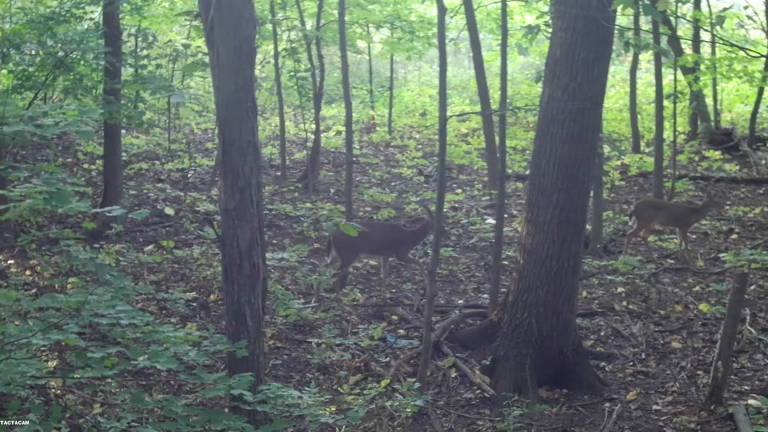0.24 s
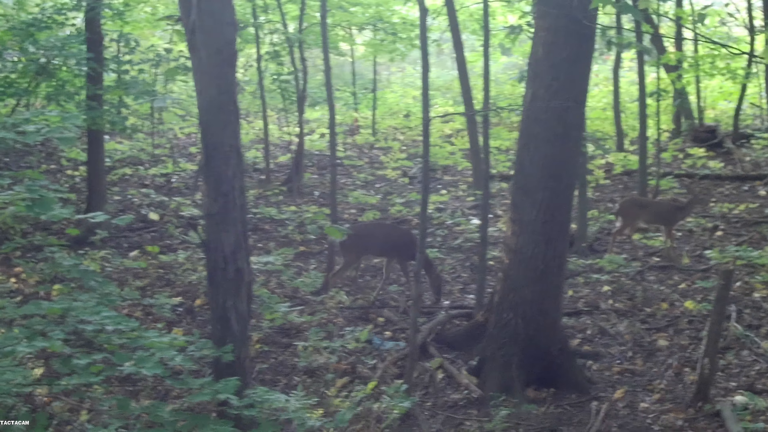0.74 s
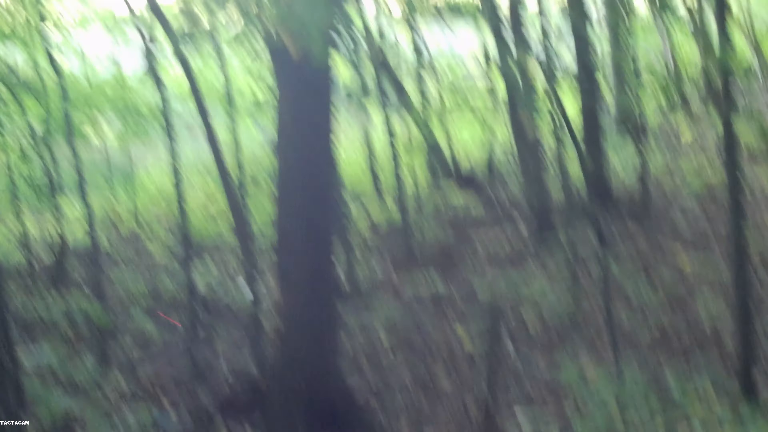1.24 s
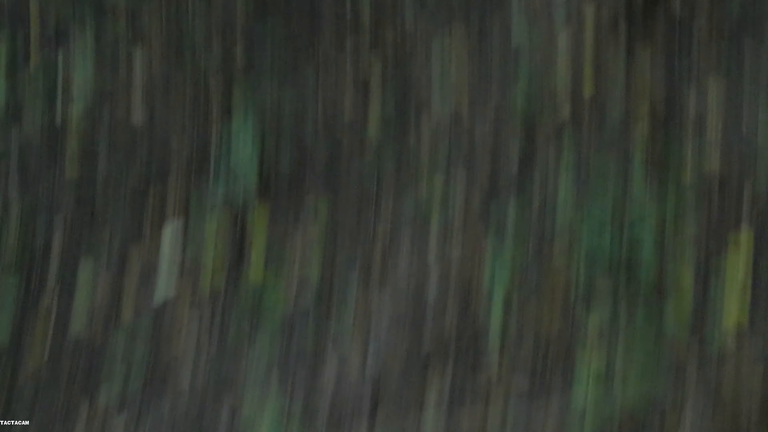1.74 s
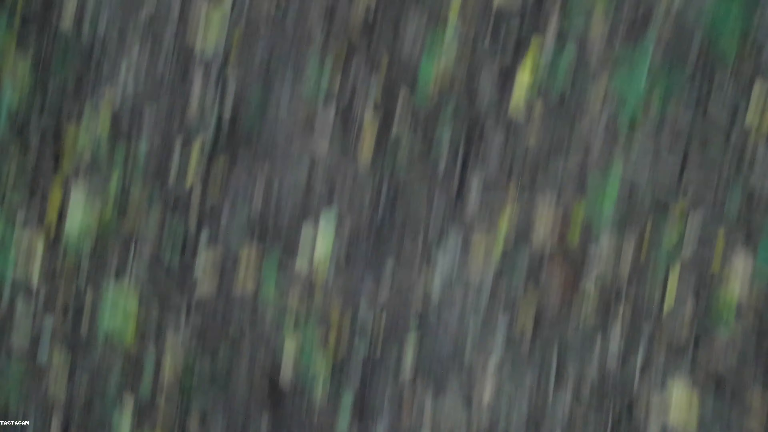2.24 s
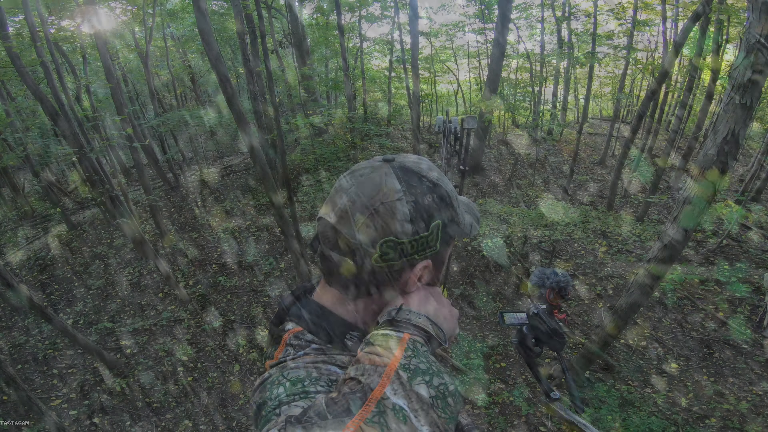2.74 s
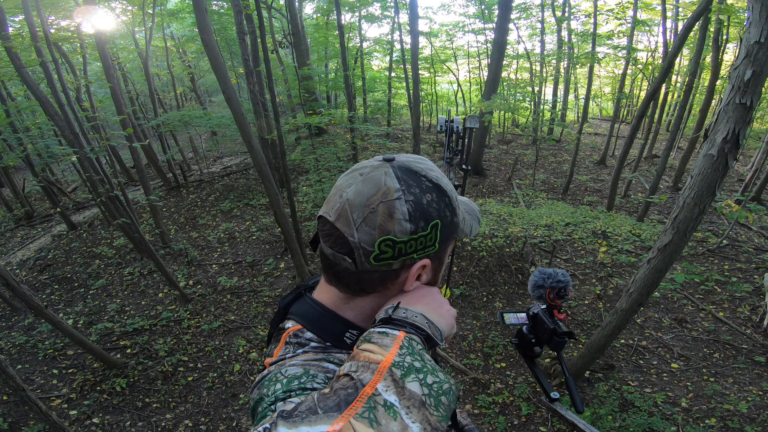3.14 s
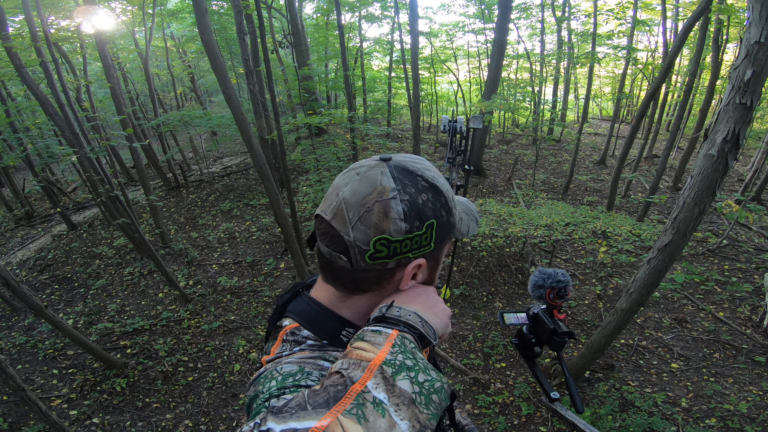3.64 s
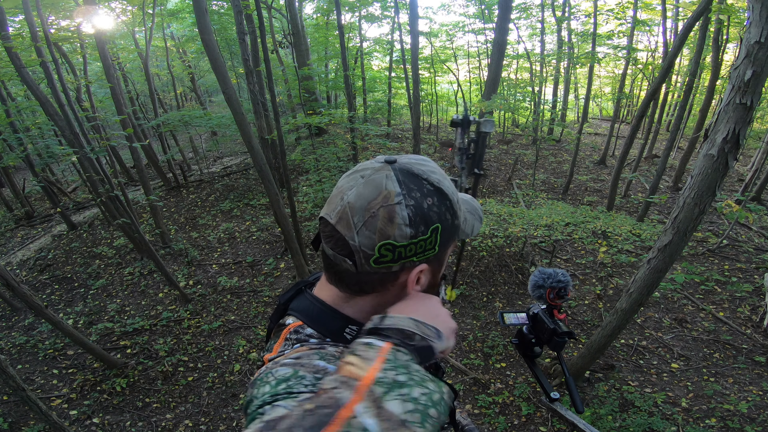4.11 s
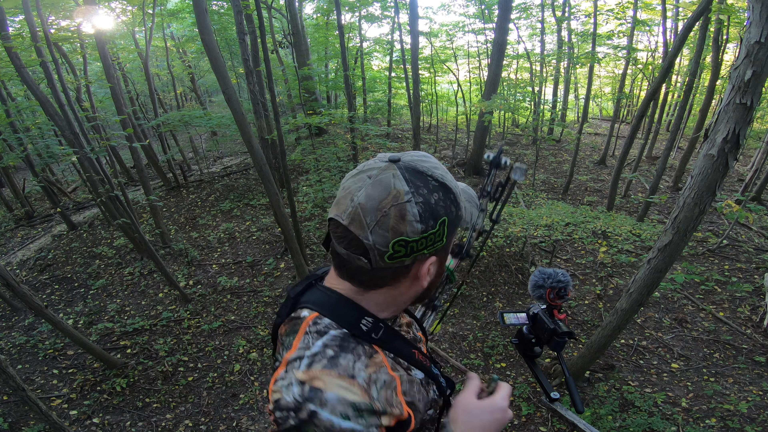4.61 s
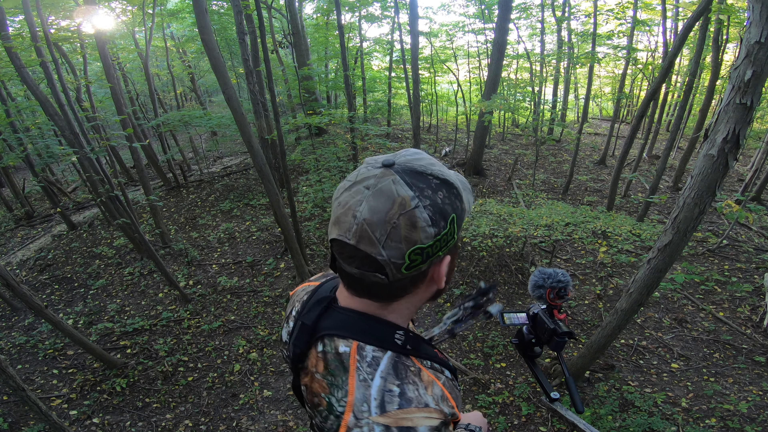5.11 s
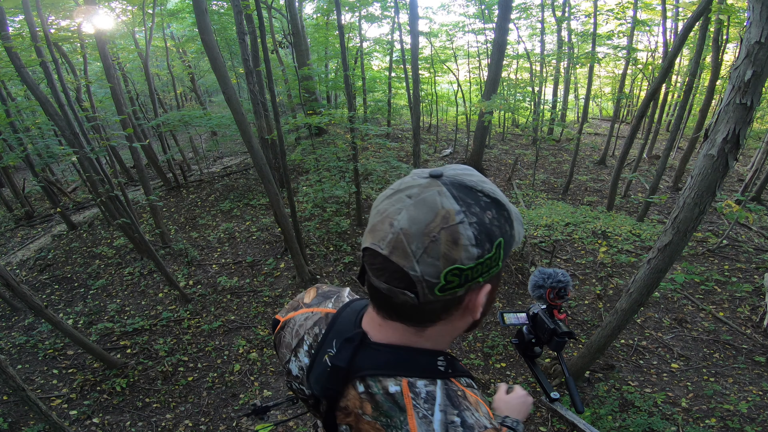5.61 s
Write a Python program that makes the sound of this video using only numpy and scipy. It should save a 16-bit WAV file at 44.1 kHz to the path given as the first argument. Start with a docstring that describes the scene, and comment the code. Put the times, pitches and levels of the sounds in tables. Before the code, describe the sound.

In quiet woods, a hunting bow fires right against the microphone: a harsh, clipped crack with metallic ringing, rattling fittings and low hum. A glassy shimmer flares as the arrow hits, then deer scatter through crackling leaves and twigs. The sound crossfades to a wider stereo view behind the archer, where the shot repeats as a dry snap with tree echoes, a bright hissy spray and leaves rustling away over faint insects.

```python
"""A bow fires in a wood: its modes ring and its fittings rattle, and the sound overloads the camera on the bow.
A glassy shimmer hangs after the shot and flares as the arrow strikes a fifth of a second later; then deer
bound off through dry leaves, made of crackling noise and short twig cracks. A crossfade leads to a camera behind
the archer, where the same shot is stereo noise snaps with echoes from the trees, a bright spray follows
the strike, and the deer run off again. Narrow trembling noise bands of insects and a soft air noise lie beneath."""
import sys
import numpy as np
from scipy import signal
from scipy.fft import rfft, irfft
from scipy.io import wavfile
from scipy.ndimage import map_coordinates

SR = 44100
rng = np.random.default_rng(int(sys.argv[2]) if len(sys.argv) > 2 else 0)


def to_wav(s):
    """Save 16-bit WAV."""
    ch = np.atleast_2d(s).T  # columns
    pcm = np.round(np.clip(ch, -1, 1) * 32767)  # PCM
    wavfile.write(sys.argv[1], SR, pcm.astype(np.int16))


N = 258426
T = np.arange(N) / SR  # time [s]
HZ = np.fft.rfftfreq(N, 1 / SR)
DECAY = np.log(1000)  # a fall of 60 dB, as an exponent

# Pushes on the bow as it fires: (time [s], strength [dB], contact time [s], rattle level [dB])
PUSHES = [(0.7665, -7, .002, -24.5), (0.773, -7.5, .0015, -19), (0.779, -9.5, 0.0014, -3),
          (0.7912, 6, .0005, 7), (0.7992, 4.5, .0005, 5), (0.8108, 3.5, .0006, -8),
          (0.822, -2, .0007, -15.5), (0.858, -8, .006, -35.5)]
# Scattering of a sound by the trees: (centre [Hz], band level [dB], t60 [s])
TREES = [(150, -24, 0.83), (495, -11.5, 0.42), (1180, -21, 1), (3020, -15.5, 1.15), (5500, -17.5, 1),
         (7600, -16, 0.91), (11400, -30, 0.89)]
# Deer bounding through the leaves, as the bow camera hears them: (time [s], level [dB], rise [s])
BOUNDS = [(1.32, -49, .09), (1.69, -53.5, .25), (2.09, -56, .17), (2.4, -52.3, .02), (2.52, -47.3, .06),
          (2.76, -56, .1)]
REAR_RUN_DELAY_S = 3.287  # the rear camera hears the same run this much later


def amp(db):
    """Decibels to gain."""
    return 10 ** (np.asarray(db) / 20)


def unit(x):
    """Scales to rms 1."""
    return x / np.sqrt(np.mean(x ** 2) + 1e-20)


def read(points):
    """Draws a spectrum table on the frequency axis, straight between points in log frequency."""
    hz, value = np.transpose(points)
    return np.interp(np.log(HZ + 1), np.log(hz + 1), value)


def hump(hz, width_hz):
    """A bell around one frequency, height 1, falling to half at width_hz from its centre."""
    return 1 / (1 + ((HZ - hz) / width_hz) ** 2)


def noise(colour_db, alike=None):
    """Coloured noise of rms 1: mono, or a stereo pair with the given left-right likeness."""
    mid = rfft(rng.standard_normal(N))
    if alike is None:
        return unit(irfft(mid * amp(colour_db), N))
    side = rfft(rng.standard_normal(N))
    likeness = np.clip(alike, -1, 1)
    mid = mid * np.sqrt(1 + likeness)
    side = side * np.sqrt(1 - likeness)
    return unit(irfft(np.array([mid + side, mid - side]) * amp(colour_db), N))


def waver(per_s, depth_db):
    """A gain that glides between random levels, per_s of them a second, spread by depth_db."""
    levels = rng.standard_normal(8192)
    return amp(depth_db * np.interp(T * per_s, np.arange(8192), levels))


def strike(s, rise, t60, t=T):
    """Envelope that swells exponentially up to time s and then dies away."""
    swell = (t - s) / rise
    decay = (s - t) * DECAY / t60
    return np.exp(np.maximum(np.minimum(swell, decay), -40))


def swells(rows, t60, t=T):
    """Gain of overlapping swells (time, level, rise) that die away alike; their energies add."""
    return np.sqrt(sum((amp(db) * strike(s, rise, t60, t)) ** 2 for s, db, rise in rows))


def tail(bands):
    """One second of noise whose overlapping bands die at their own speeds."""
    white = rfft(rng.standard_normal(SR))
    log_hz = np.log(np.arange(SR // 2 + 1) + 1)
    centres = np.log([row[0] for row in bands])
    out = 0
    for pick, (_, db, t60) in zip(np.eye(len(bands)), bands):
        band = irfft(white * np.interp(log_hz, centres, pick), SR)
        out = out + unit(band) * amp(db) * np.exp(-DECAY * T[:SR] / t60)
    return out


def add(mix, s, sound):
    """Lays a sound into the mix at time s."""
    part = mix[round(s * SR):][:len(sound)]
    part += sound[:len(part)]


def swings(rows):
    """Damped oscillations that build up over the rise and then die away."""
    out, t = np.zeros(N), T[:SR]
    for s, hz, db, rise, t60 in rows:
        envelope = np.minimum(t / rise, 1) * np.exp(-DECAY * np.maximum(t - rise, 0) / t60)
        add(out, s, amp(db) * np.sin(2 * np.pi * hz * t) * envelope)
    return out


def bow():
    """Each push feeds the bow's modes and shakes its fittings; a longer contact favours the low modes."""
    # Ringing modes of the bow: (frequency [Hz], level [dB], t60 [s])
    modes = [(175, -24, .36), (201, -43.5, 1.3), (217.4, -21, .26), (247.4, -20, .22), (266.8, -17.5, 0.29),
             (328, -18.5, 0.31), (366, -6.5, 0.19), (396.3, -6.5, 0.16), (437.5, -10, .2),
             (517, -10.5, 0.28), (611.5, -11, .22), (642, -12, .22), (678.5, -10.5, .23), (703, -45.5, 1.2),
             (704, -47, 1.3), (739.4, -10.5, .26), (764.4, -15, 0.13), (882, -18.5, 0.23), (930, -20, .33),
             (1019.5, -19, 0.28), (1060, -20, .17), (1286, -38, 0.37), (1700, -22.5, 0.11),
             (1980, -25.5, 0.13), (2740, -35, .33), (3382, -26, 0.23), (3450, -26.5, 0.25),
             (3590, -22, 0.22), (5650, -35, .28)]
    # Loose fittings: (centre [Hz], band level [dB], t60 [s])
    rattle = [(119.76, -12.5, .22), (350, -9.5, .18), (880, -10.5, .15), (1270, -23.5, 0.17),
              (1860, -14, .16), (3500, -11, 0.086), (6950, -12.5, 0.089), (14100, -15, 0.043)]
    # Slow swings of limbs and string: (time [s], frequency [Hz], level [dB], rise [s], t60 [s])
    slow_swings = [(0.7637, 185, -1.5, .002, .04), (0.772, 62.12, -6.5, 0.017, 0.41),
                   (0.79, 87.1, -5, 0.045, .45), (0.962, 89.8, -14, 0.0077, 0.61),
                   (1.02, 86.6, -11.5, 0.024, .6), (0.765, 26, -8, .01, 0.46)]
    out, t = np.zeros(N), T[:SR]
    start = PUSHES[0][0] - .004
    for hz, mode_db, t60 in modes:
        energy = 0
        for s, db, contact, _ in PUSHES:
            push = amp(db) ** 2 / (1 + (hz * contact) ** 2)
            energy = energy + push * strike(s - start, contact, t60, t) ** 2
        bend_hz = 12 * (waver(35, 3)[:SR] - 1)  # the swinging limbs bend the pitch, drawn at random
        turns = np.cumsum(hz + bend_hz) / SR + rng.random()
        ring = np.sqrt(energy) * waver(30, 2.6)[:SR] * np.sin(2 * np.pi * turns)
        add(out, start, amp(mode_db) * ring * np.minimum(t / .003, 1))
    for s, _, _, rattle_db in PUSHES:
        add(out, s, amp(rattle_db) * tail(rattle))
    release_hiss = noise(read([(1000, -13.5), (6000, -2), (16000, 0)]))
    release = release_hiss * amp(-4) * strike(.7672, .0002, 0.0062)
    return out + release + swings(slow_swings)


def snaps(alike):
    """Tilted noise bursts and dull bumps through the air, each burst scattered back by the trees."""
    # Release, arrow rest, string, arrow's strike, twigs:
    # (time [s], level [dB], rise [s], t60 [s], tilt [dB per octave])
    bursts = [(4.0511, -21.5, 0.00044, .014, 2), (4.059, -31, .0004, 0.011, 9),
              (4.078, -27, 0.0084, 0.08, 1), (4.0785, -10, .0005, 0.019, 0.5),
              (4.297, -24.5, 0.001, 0.04, 1), (4.766, -38, 0.00069, 0.051, 1),
              (5.665, -51, 0.0017, 0.062, 1.5)]
    # Their colour before the tilt: (frequency [Hz], level per Hz [dB])
    colour = [(40, -3), (150, 2), (350, -1.5), (650, 0), (950, -2.5), (1400, -12.5), (3200, -6.5),
              (5000, -12.5), (8000, -11.5), (11000, -29.5), (16000, -42)]
    # Dull bumps: (time [s], frequency [Hz], level [dB], rise [s], t60 [s])
    bumps = [(4.0785, 160, -17.5, 0.0016, .03), (4.0785, 525, -27, .001, .04),
             (4.079, 960, -20, 0.001, 0.0097), (4.2965, 550, -21, 0.0011, 0.015),
             (4.795, 108.2, -44, .015, 0.092)]
    octaves = np.log2((HZ + 200) / 2000)
    direct, mid, side = swings(bumps), np.zeros(N), np.zeros(N)
    for s, db, rise, t60, tilt in bursts:
        burst = noise(read(colour) + tilt * octaves, (1 + alike) / 2)
        direct = direct + burst * amp(db) * strike(s, rise, t60)
        for echo in (mid, side):  # a longer snap holds more energy and echoes louder
            add(echo, s + 0.0084, amp(db - 3) * np.sqrt(t60) * tail(TREES))
    return direct + np.array([mid + 0.57 * side, mid - 0.74 * side])


def shimmer(patch_s=0.033, patch_hz=130):
    """Noise in narrow bands that flicker in short glassy fragments and flare at the arrow's strike."""
    # Glassy bands: (centre [Hz], level [dB])
    glass = [(2250, -10.5), (2772, -11.5), (3171, -6), (3397, -4), (3731, -6), (3887, -5.5), (4021, -8.5),
             (4215, -1.5), (4619, -7.5), (4802, -6.5), (5055, -5), (5615, -0.5), (6072, -7), (6374, -8),
             (6842, 0.5), (7230, -5.5), (7488, -12.5), (7817, -5.5), (8258, -16), (8425, -12.5), (8581, -6),
             (8893, -17), (9076, -10.5), (9232, -12), (9432, -15), (9792, -16.5), (9948, -14), (11176, -19),
             (11493, -13), (12258, -19)]
    # Faint fragments between the bands: (frequency [Hz], level [dB])
    glass_bed = [(1000, -50), (1500, -19), (3000, -20), (5000, -32), (9000, -34), (12500, -36),
                 (14000, -27), (15600, -28), (16500, -55)]
    # Swells of the shimmer: (time [s], level [dB], rise [s])
    flares = [(.885, -44.5, .07), (1.012, -33.5, .014)]
    width_hz, flicker_db, flare_t60_s = 52, 8, .66
    hz, t, z = signal.stft(rng.standard_normal(N), SR, nperseg=1024, noverlap=768)
    bands = sum(amp(db) / (1 + ((hz - centre) / width_hz) ** 2) ** 2 for centre, db in glass)
    colour = bands + amp(np.interp(hz, *np.transpose(glass_bed)))
    # smooth random patches over frequency and time
    grid = np.meshgrid(hz / patch_hz, t / patch_s, indexing="ij")
    patches = map_coordinates(rng.standard_normal((600, 600)), grid, order=1)
    flicker = amp(flicker_db * np.minimum(patches, .6))  # deep holes, even tops
    fragments = signal.istft(z * colour[:, None] * flicker, SR, nperseg=1024, noverlap=768)[1][:N]
    return unit(fragments) * swells(flares, flare_t60_s) * (T > PUSHES[0][0])


def knocks():
    """Coloured noise bursts for knocks out in the wood, tilted above about 2 kHz."""
    # Arrow's strike first: (time [s], level [dB], rise [s], t60 [s], tilt [dB per octave])
    wood_knocks = [(1.011, -36.5, 0.035, 0.29, -19), (1.098, -46.5, .008, 0.32, -19),
                   (1.317, -44, .008, 0.088, -13), (1.478, -40.5, .002, 0.096, 5)]
    # Their colour before the tilt: (frequency [Hz], level per Hz [dB])
    colour = [(100, -1), (300, 3), (700, 7.5), (1500, -3), (4000, -2), (7000, -10), (11000, -24),
              (16000, -34)]
    octaves = np.maximum(np.log2((HZ + 200) / 2000), 0)
    out = 0
    for s, db, rise, t60, tilt in wood_knocks:
        out = out + noise(read(colour) + tilt * octaves) * amp(db) * strike(s, rise, t60)
    return out


def spray(alike):
    """Bright resonant noise that opens at the arrow's strike, swells and dies away."""
    # Spray colour: (frequency [Hz], level per Hz [dB])
    colour = [(200, -29), (600, -3.5), (1100, -10), (2000, -1.5), (3400, 0), (4700, -1.5), (8200, 4.5),
              (9500, -13), (12000, -23), (16000, -38)]
    # Resonances on top of it: (frequency [Hz], width [Hz], boost [dB])
    peaks = [(3220, 160, 4.5), (3920, 120, 7.5), (5200, 70, -4), (5620, 140, 8), (6250, 60, -1),
             (7400, 70, 8), (8060, 120, 3)]
    resonances = sum(db * hump(hz, width) for hz, width, db in peaks)
    hiss = noise(read(colour) + resonances, alike)
    return hiss * amp(-28.0) * strike(4.324, 0.042, 0.55) * (T > 4.297)


def handling():
    """Low rumble of the hand on the bow: a steady grip, and one swell as the bow is lowered."""
    rumble = noise(read([(8, 0), (25, 1), (60, -10.5), (110, -11.5), (250, -34), (1000, -58.5)]))
    grip = amp(-42)
    lowering = amp(-35) * strike(1.45, 0.33, 3.5)
    return rumble * np.hypot(grip, lowering)


def leaves(colour, alike=None, crackle_db=1.5, clump_db=2.5):
    """Dry leaves: noise crackling in clumps, with short cracks of twigs breaking under the hooves."""
    # Twig colour: (frequency [Hz], level per Hz [dB])
    twig_colour = [(300, -8), (1000, -6), (2000, -2), (3500, 0), (5000, -8), (9000, -16), (16000, -40)]
    twigs_per_s, twig_db, twig_t60_s = 14, 1, .04
    rustle = unit(noise(read(colour), alike) * waver(900, crackle_db) * waver(32, clump_db))
    breaks = (rng.random(N) < twigs_per_s / SR) * rng.random(N)  # random times and strengths
    cracks = signal.oaconvolve(breaks, np.exp(-DECAY * T[:SR // 4] / twig_t60_s))[:N]
    return rustle + amp(twig_db) * cracks * noise(read(twig_colour))


def running(t):
    """Stir of the leaves: a swell for each bound over a fading scuffle that rises with the first."""
    settle_t60_s, scuffle_db, scuffle_t60_s = .92, -53.5, 4.2
    start, _, rise = BOUNDS[0]
    scuffle = amp(scuffle_db) * strike(start, rise, scuffle_t60_s, t)
    return np.hypot(swells(BOUNDS, settle_t60_s, t), scuffle)


def insects(hz, width_hz, db, alike=None):
    """Many far insects merge into one narrow trembling band of noise."""
    band_db = 40 * np.log10(hump(hz, 1.2 * width_hz))
    return amp(db) * noise(band_db, alike) * waver(50, 1.0)


def air_bow():
    """Steady noise of the still wood at the bow camera."""
    # Air colour: (frequency [Hz], level per Hz [dB])
    colour = [(10, 2), (25, -3), (50, -4.5), (100, -12), (180, -18), (400, -29), (800, -33), (1500, -37),
              (3500, -45.5), (6000, -47), (10000, -52.5), (16000, -61)]
    return amp(-41) * noise(read(colour))


def air_rear(alike):
    """Stereo noise of the still wood at the rear camera, wavering slightly."""
    # Air colour: (frequency [Hz], level per Hz [dB])
    colour = [(20, -20), (70, -19), (120, -7.5), (170, 1), (250, -8), (400, -17.5), (600, -19.5),
              (800, -19), (1100, -28), (2000, -33.5), (3500, -31), (6000, -33), (8500, -35), (10500, -62),
              (16000, -70)]
    return amp(-54) * noise(read(colour), alike) * waver(6.7, 0.5)


def lull(wood):
    """Sinks the wood's hiss, above about 2600 Hz, by 20 dB for a moment after the shot."""
    start_s, ramp_s, hold_s, depth_db = .8, .052, 0.37, -20
    corners = start_s + np.cumsum([0, ramp_s, hold_s, ramp_s])
    gain = amp(np.interp(T, corners, [0, depth_db, depth_db, 0]))
    low = irfft(rfft(wood) / (1 + (HZ / 2600) ** 6), N)
    return low + (wood - low) * gain


def bow_camera():
    """Mono; the shot reaches the microphone through the bow itself and drives it into clipping."""
    # Leaf colour: (frequency [Hz], level per Hz [dB])
    leaf_colour = [(300, 1.5), (1000, -5), (2000, -2), (3800, 2), (6000, 2.5), (8000, 1.5), (10000, -8.5),
                   (13000, -18), (16000, -23)]
    wood = air_bow() + insects(7000, 480, -60) + insects(12000, 450, -73)
    wood = wood + leaves(leaf_colour) * running(T)
    add(wood, .8, amp(-35) * tail(TREES))  # the trees return the shot
    offset = .08  # the input sits slightly off centre, so it clips unevenly
    return np.clip(bow() + shimmer() + knocks() + handling() + lull(wood) + offset, -1, 1)


def rear_camera():
    """Stereo; the shot, spray and run arrive through the air over the insects and still wood."""
    # Left-right likeness: (frequency [Hz], likeness [1 = identical])
    likeness = [(100, 1), (500, 0.51), (1500, 0.11), (4000, 0.73), (8000, 0.04), (16000, 0.19)]
    # Leaf colour: (frequency [Hz], level per Hz [dB])
    leaf_colour = [(300, -13.5), (700, -8), (1150, -11), (1800, -2.5), (3200, 1.5), (4600, -3.5),
                   (6000, -2), (7800, -.5), (9200, -8.5), (11000, -19.5), (14000, -26), (16000, -44)]
    alike = read(likeness)
    since_first_bound = T - REAR_RUN_DELAY_S - BOUNDS[0][0]
    carry = amp(1.2 + 1.2 * since_first_bound)  # the run carries better, by 1.2 dB a second
    run = leaves(leaf_colour, alike, crackle_db=1.5, clump_db=0.3) * running(T - REAR_RUN_DELAY_S)
    background = air_rear(alike) + insects(7170, 650, -57.5, alike)
    return snaps(alike) + spray(alike) + carry * run + background


def scene():
    """The bow camera crossfades into the rear camera."""
    # Crossfade: (start [s], end [s])
    fade = (2.584, 2.938)
    share = np.interp(T, fade, (0, 1))
    return (1 - share) * bow_camera() + share * rear_camera()


def record(dry):
    """Low-pass filter that limits the band to 16.3 kHz."""
    lowpass = signal.firwin(255, 16300, window=("kaiser", 8), fs=SR)
    return signal.oaconvolve(dry, lowpass[None], "same")


dry = scene()
out = record(dry)
to_wav(out)
```